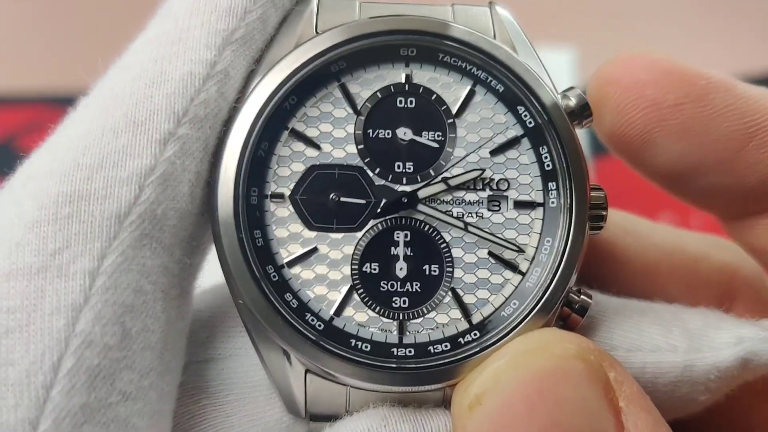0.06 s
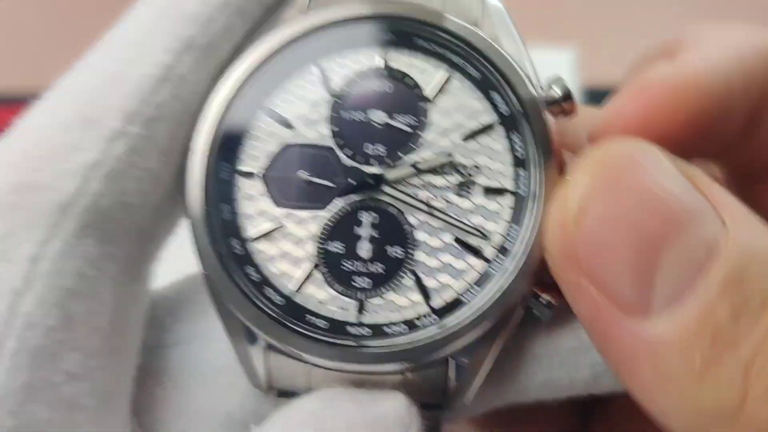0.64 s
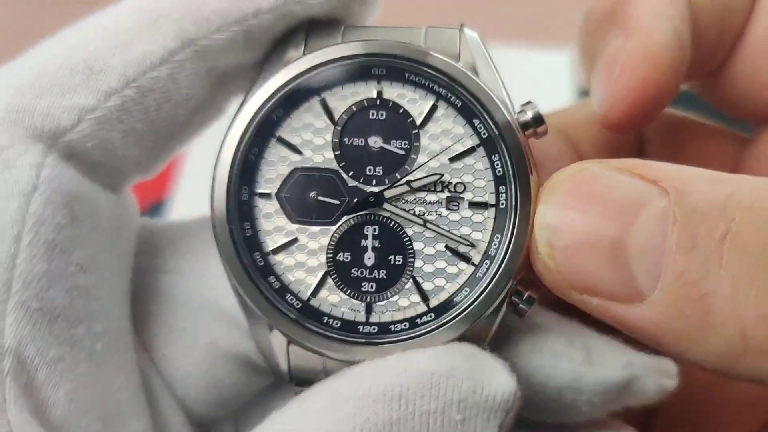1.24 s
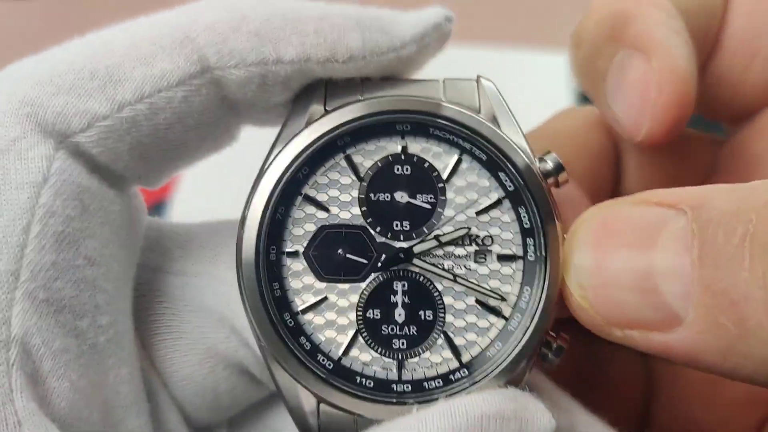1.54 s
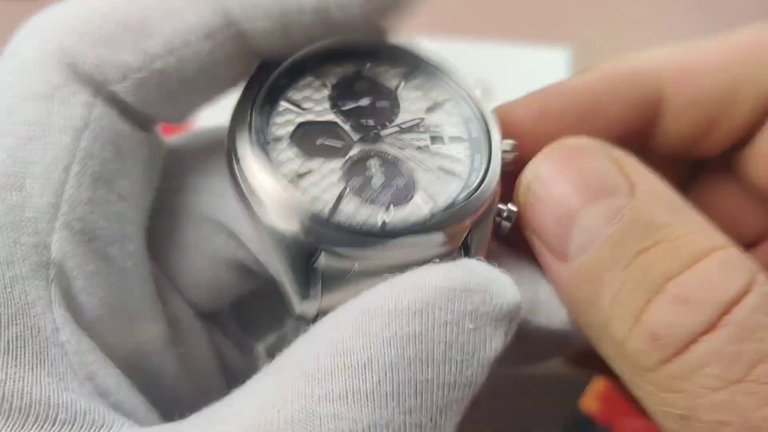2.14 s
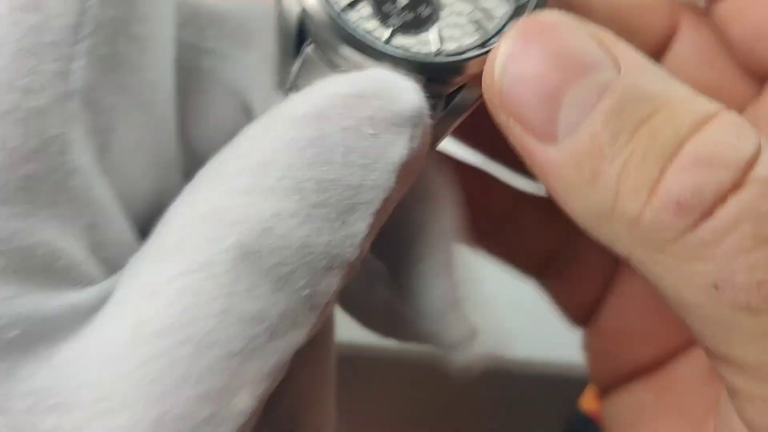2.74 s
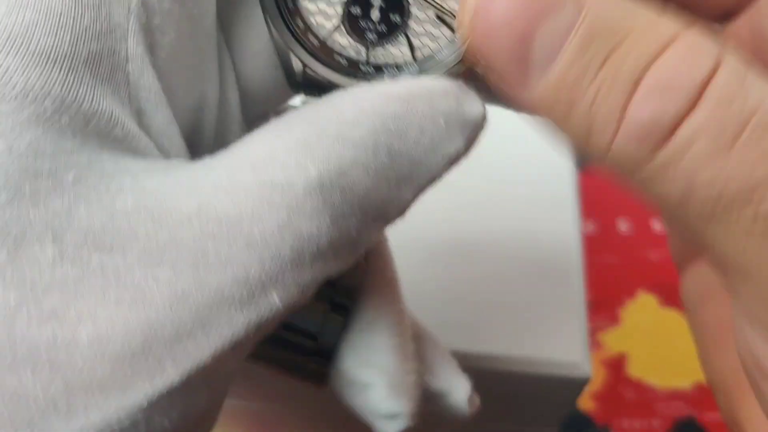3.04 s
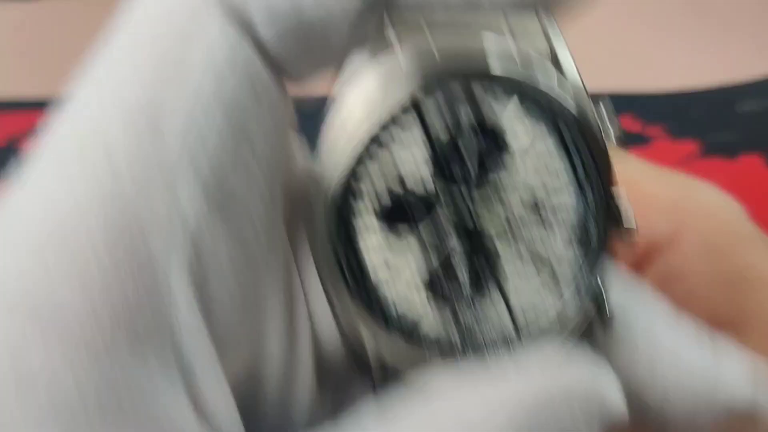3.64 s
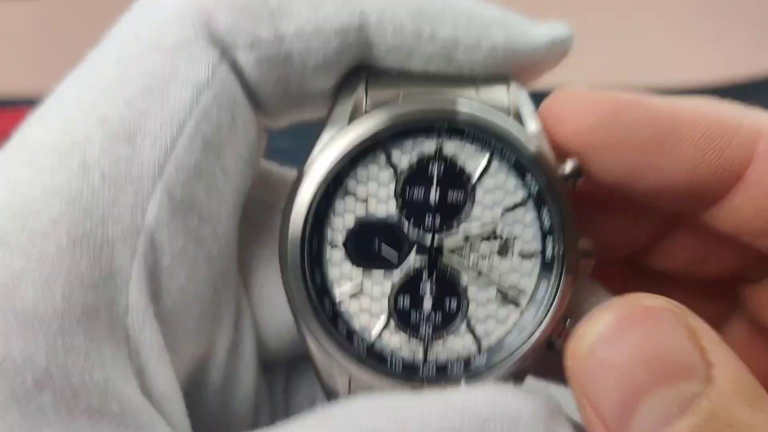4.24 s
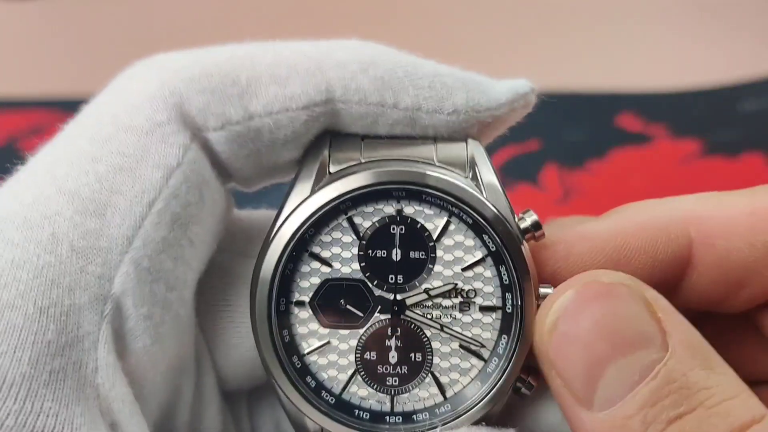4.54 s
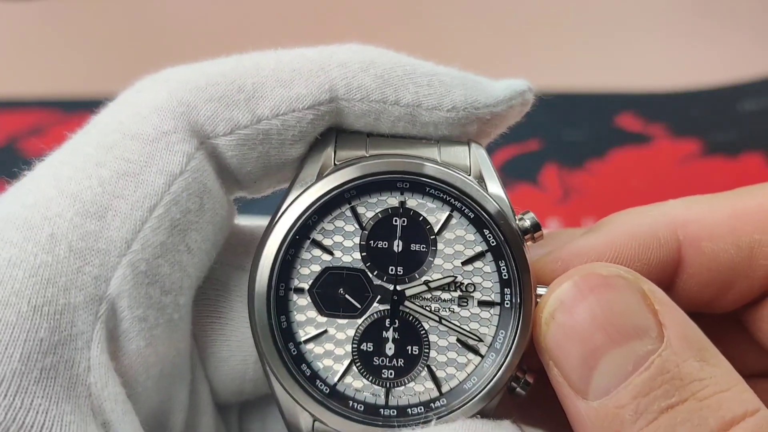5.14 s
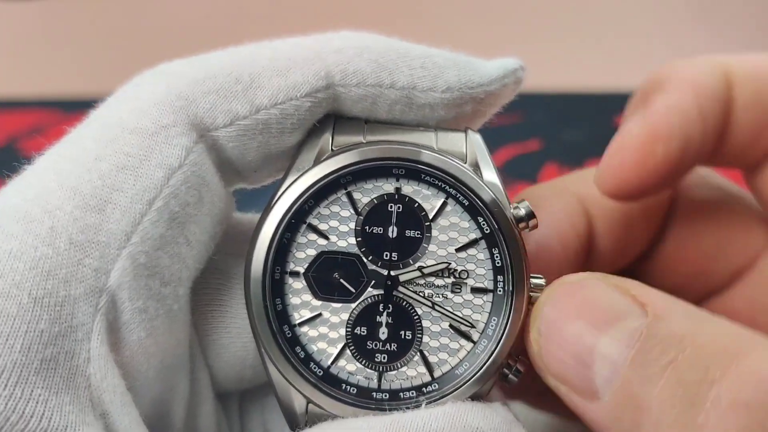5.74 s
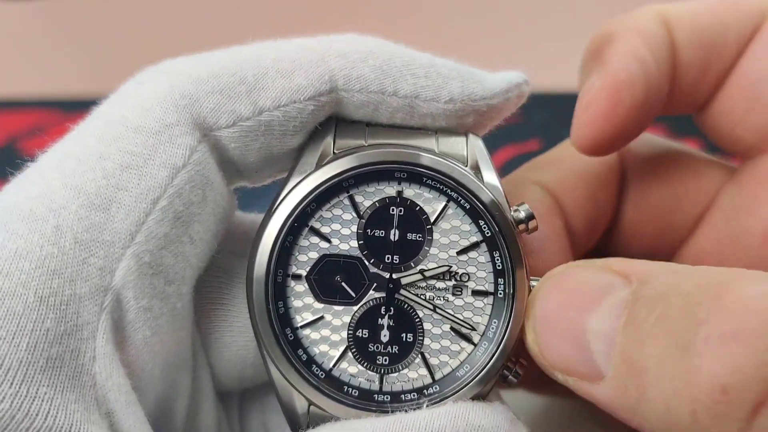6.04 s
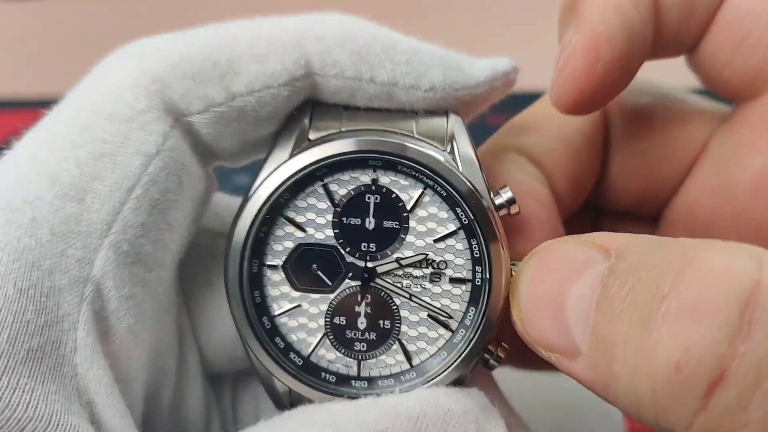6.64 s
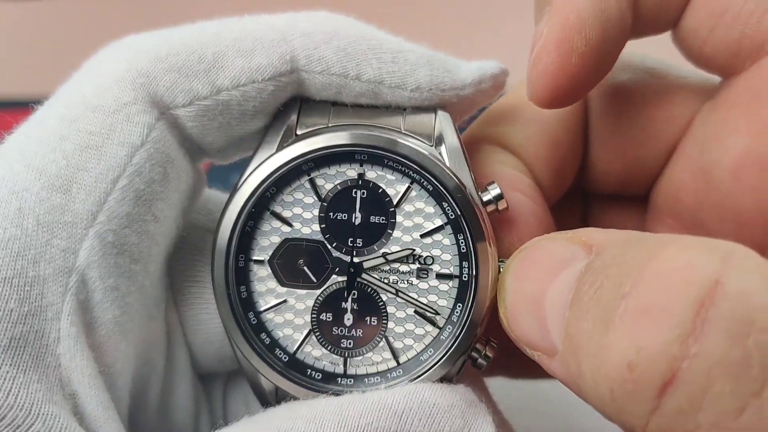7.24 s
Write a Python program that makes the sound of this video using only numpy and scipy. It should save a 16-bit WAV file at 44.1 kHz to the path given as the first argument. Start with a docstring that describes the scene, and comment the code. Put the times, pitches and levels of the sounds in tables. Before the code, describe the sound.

A cotton-gloved hand turns a steel wristwatch very close to the microphone, in a quiet room with a faint low rumble. For the first two seconds there are only soft brushes of fabric and a few tiny clicks. At about 2.1 seconds the glove bumps and rubs the microphone's housing, with a loud hollow knock near 2.3, a brief rough groan and two sharp clicks around 2.5. Softer cloth hiss and small bracelet ticks follow until 3.4. Another loud knock at 3.5 starts a busier run of hollow bumps, juddering scuffs and metallic clicks, with strong knocks near 3.8 and 4.4, dying down at about 5 seconds. From there until the end, a little after 7 seconds, fingers working the crown make faint, irregular taps, with an occasional light brush of cloth.

```python
"""The hollow housing of a small camera knocks and drones as a cotton-gloved hand bumps and rubs it.
Impact and stick-slip friction excite the same damped modes; a tight grip makes the main one groan.
The hand is turning a steel wristwatch: the weave hisses and snags, the bracelet's links resonate,
and later, fingers working the crown pass faint taps into the housing.
The desk adds early reflections, the quiet room a faint reverberation and rumble."""
import sys
import numpy as np
from scipy import signal
from scipy.fft import rfft, irfft, next_fast_len
from scipy.io import wavfile

SR = 44100
rng = np.random.default_rng(int(sys.argv[2]) if len(sys.argv) > 2 else 0)


def transcribe(u):
    """Save the signal u as a 16-bit wav file named by the first command-line argument.

    u: samples, shape (n,) or (channels, n), limited to [-1, 1]; the rate is SR.
    q: integer samples, one column per channel.
    """
    v = np.clip(np.atleast_2d(u).T, -1, 1)
    q = np.round(v * 32767).astype(np.int16)
    wavfile.write(sys.argv[1], SR, q)


N = 321397
TIME = np.arange(N) / SR
CUTOFF_HZ = 16000

# drags of the glove over the housing: t/s, length/s, friction/dB, hiss/dB, hardness/(dB/octave), swell/dB
STROKES = [(0.907, 0.86, -80.5, -78, 3, -6.5), (2.135, 0.05, -46.5, -48.5, -13, -0.5),
           (2.198, 0.056, -53.5, -48, 6, 3.5), (2.268, 0.043, -43.5, -53.5, -10.5, -1),
           (2.359, 0.14, -40, -54, -11.5, 6), (2.541, 0.049, -41, -53.5, -24, 4.5),
           (2.604, 0.05, -63, -59, 8.5, 1), (3.36, 0.15, -71.5, -61.5, 8.5, 13.5),
           (3.53, 0.038, -39, -47.5, -8.5, -3.5), (3.587, .14, -50, -53.5, 0, 1),
           (3.733, 0.055, -48, -52.5, 7.5, 4), (3.839, 0.026, -44, -47.5, -5.5, -5.5),
           (3.881, 0.067, -47, -62, -4, -2.5), (3.968, 0.11, -66, -68.5, 7.5, -9.5),
           (4.084, 0.15, -66.5, -65, 9, 6), (4.181, 0.098, -42, -53.5, 2.5, 8.5),
           (4.298, 0.093, -35.5, -52, 4, -2), (4.436, 0.039, -44.5, -62.5, -14, 0),
           (4.497, 0.025, -39, -61, -8, 5), (4.544, 0.078, -48.5, -63, -14, -2.5),
           (4.625, 0.16, -59.5, -69, 5.5, 3), (4.719, 0.045, -45, -62, 0, 0.5),
           (4.78, 0.15, -55, -70, -8, -2), (4.953, 0.15, -69.5, -82, -1, -11),
           (5.217, 0.069, -65, -91, 0, -4)]
# resonances of the steel links: f/Hz, bandwidth/Hz, level/dB
LINK_MODES = [(4703, 170, -2), (7670, 390, -2), (12450, 300, -17), (15300, 500, -3)]
# left-right coherence of the cloth's noise: f/Hz, correlation/1
CLOTH_COHERENCE = [(600, 0.95), (4000, 0)]


def knocks(level_db=-4.0, contact_hz=1750, panel_hz=(700, 1100), stand_below_hz=180):
    """Impact excitation, padded by cotton: hardness favours high modes, the spot hit panel or stand."""
    onsets, blow_db, hardness, _, panel_db, stand_db = np.transpose(bumps())

    def force_at(octaves, hz):
        force = np.zeros(N)
        spot_db = panel_db * (panel_hz[0] < hz < panel_hz[1]) + stand_db * (hz < stand_below_hz)
        force[np.round(onsets * SR).astype(int)] = -from_db(blow_db + hardness * octaves + spot_db)
        return force
    return from_db(level_db) * low_pass(housing(force_at), contact_hz, order=3)


def bumps(tap_hardness=0.0, tap_crackle_db=-26, tap_panel_db=2):
    """Impulses on the housing, direct or structure-borne, all in the columns of the blows."""
    # the hand's blows: t/s, level/dB, hardness/(dB/octave), crackle/dB, panel boost/dB, stand boost/dB
    blows = [(1.5673, -58.5, 9, -64, 5, 0), (2.1415, -25, -15, -37.5, -15, -3),
             (2.272, -33, -10, -55, 0, 0), (2.3454, -13.5, -8, -29.5, -1, 2),
             (3.532, -14, 1.5, -28, 1.5, 5), (3.6066, -33.5, -18.5, -55, 0.5, -2.5),
             (3.6516, -32.5, -7.5, -58.5, 0, 0), (3.7081, -32, 9.5, -43.5, 0, 0.5),
             (3.7655, -36, 13.5, -46, -8, 1.5), (3.8341, -14.5, -15.5, -35.5, 14, 0.5),
             (3.8378, -19.5, -2.5, -37.5, 9, -3.5), (3.856, -29.5, -3.5, -44, 1.5, 1.5),
             (3.8705, -31.5, 12, -40, 1, 0), (4.1039, -33.5, 2.5, -54, -4.5, -4),
             (4.1369, -41.5, -23, -56.5, -1.5, -3), (4.2998, -26, -10, -58, -2, 0),
             (4.3423, -25.5, 7, -38, 1, -0.5), (4.4254, -13.5, -3, -49.5, -1.5, -13),
             (4.5021, -30, 2, -68, 3, -11), (4.5212, -31, -10, -35, -1, -5.5),
             (4.5754, -25.5, 10, -41, 5.5, -7), (4.633, -40, -5, -48.5, 3, -9),
             (4.791, -25.5, -3, -51.5, -9, -6), (4.8542, -22, 6, -63.5, 2.5, -4)]
    # taps from fingers on the crown: t/s, level/dB
    taps = [(5.0143, -50.5), (5.1838, -55.5), (5.532, -58), (5.6737, -45), (5.7488, -55.5), (5.794, -51.5),
            (5.8034, -52), (5.935, -41.5), (5.9444, -53), (6.1086, -50.5), (6.122, -46.5), (6.2048, -56.5),
            (6.3553, -56), (6.6603, -46.5), (6.6785, -56.5), (6.7434, -56), (6.935, -55)]
    return blows + [(s, db, tap_hardness, db + tap_crackle_db, tap_panel_db, 0) for s, db in taps]


def housing(force_at, left_db=3.0, lag_s=.0001, left_db_per_octave=5.0):
    """Modal superposition: force_at(octaves above the main mode, hz) drives each damped resonator."""
    # modes of the housing on its stand: f/Hz, level/dB, T60/s
    modes = [(55, -29, 0.28), (135, -23.5, 0.13), (252, -19, .04), (333.5, -12, 0.05), (483.8, 4, 0.029),
             (535, -23.5, 0.31), (578, -13, 0.05), (798, -10, 0.043), (920, -9, 0.016), (1357, -11.5, 0.02),
             (1460, -25, 0.029), (2505, -16, 0.011)]
    main_hz = max(modes, key=lambda mode: mode[1])[0]
    out = np.zeros((2, N))
    for hz, level_db, t60 in modes:
        radius, angle = from_db(-60 / (t60 * SR)), 2 * np.pi * hz / SR
        poles = [1, -2 * radius * np.cos(angle), radius * radius]
        octaves = np.clip(np.log2(hz / main_hz), -.4, 1.7)
        ring = signal.lfilter([1, 0, -1], poles, force_at(octaves, hz) + 1e-18) / 2
        # upper modes differ more between the two microphone ports
        ports = np.array([ring, delayed(ring, lag_s * (1 + octaves / 2))])
        out += from_db(level_db) * ports * pan(left_db + left_db_per_octave * octaves)
    return out


def drag(level_db=-21.5, contact_hz=2300, judder_db=2.0,
         scuff_db=-25, scuff_growth=0.73, scuff_t60=0.13, scuff_hardness=-1.4):
    """Stick-slip friction: random slips drive the housing during each stroke and each bump's scuff."""
    _, _, friction_db, _, hardness, _ = np.transpose(STROKES)
    stroke_powers = np.array([rub(s, length, swell) for s, length, *_, swell in STROKES]) ** 2
    scuffs = bursts([(s, scuff_db + scuff_growth * db, scuff_t60) for s, db, *_ in bumps()], rise_s=.001)
    judder = from_db(judder_db * drift(90))
    slipping = slips(per_s=2600, spread_db=-0.5)

    def force_at(octaves, hz):
        pressure = judder * np.sqrt(from_db(friction_db + hardness * octaves) ** 2 @ stroke_powers)
        return slipping * np.hypot(pressure, scuffs * from_db(scuff_hardness * octaves))
    return from_db(level_db) * low_pass(housing(force_at), contact_hz)


def groan(sag_hz_per_s=291, jitter=.065, throb_hz=65):
    """Mode locking: slips fall in step with the main mode; the rough tone sags as the grip tightens."""
    # tight grips of the glove: t/s, length/s, level/dB, starting f/Hz
    grips = [(2.372, 0.12, -33.5, 532), (2.544, .025, -42, 510)]
    waver = 1 + jitter * drift(150)
    throb = 1 + 0.71 * np.sin(2 * np.pi * throb_hz * TIME + drift(40))
    out = np.zeros((2, N))
    for s, length, db, hz in grips:
        pitch = hz - sag_hz_per_s * np.clip(TIME - s, 0, length)
        phase = 2 * np.pi * np.cumsum(pitch * waver) / SR
        tone = np.sin([phase, phase - .5])   # the right port lags
        out += from_db(db) * rub(s, length, swell_db=2.5) * tone
    return throb * out * pan(left_db=3.0)


def cloth(level_db=-.5, grain_db=2.0, flutter_db=1.5, fibre_db=-6.5, firm_db=-53, firm_slope=0.35):
    """Friction noise: the sliding weave hisses and forces the links to ring, more so in firm strokes."""
    # spectrum of the weave: f/Hz, density/dB
    spectrum = [(300, 5.5), (1000, -6), (2200, 6.5), (3400, 5.5), (4700, 6.5), (5700, 0.5), (8000, 1),
                (10000, -1), (12500, 1.5), (15500, 2)]
    hiss_db = sliding_db()
    gain = from_db(level_db + hiss_db + flutter_db * drift(110))
    # single fibres flick free as tiny, sparse clicks
    fibres = np.array([signal.lfilter([1, -.5], [1], slips(per_s=310, spread_db=4.5)) for _ in range(2)])
    grains = from_db(grain_db * drift(900)) * coloured_noise(spectrum, CLOTH_COHERENCE)
    hiss = gain * (grains + from_db(fibre_db) * fibres) * pan(left_db=1.8)
    firmness_db = firm_slope * (hiss_db - firm_db)
    links = sum(resonance(hiss * from_db(db + firmness_db + 1.7 * drift(13)), hz, width)
                for hz, width, db in LINK_MODES)
    return hiss + links


def sliding_db(resting_db=-81):
    """Incoherent addition: strokes, brushes and the never quite still glove sum in power to one level."""
    # cotton brushing steel and skin, clear of the housing: t/s, length/s, hiss/dB
    brushes = [(0.549, .085, -70.5), (0.653, 0.15, -75.5), (0.916, .045, -67), (1.144, 0.14, -76),
               (2.03, 0.02, -70.5), (2.69, 0.61, -69.5), (2.718, .13, -67.5), (2.924, 0.076, -72),
               (3.06, 0.033, -66.5), (5.657, 0.098, -76), (6.615, 0.15, -79)]
    rubs = [from_db(db) * rub(s, length, swell) for s, length, _, db, _, swell in STROKES]
    rubs += [from_db(db) * rub(s, length) for s, length, db in brushes]
    return 10 * np.log10(from_db(resting_db) ** 2 + sum(one ** 2 for one in rubs))


def snags(level_db=0.5, grain_db=2.5, ring_db=9.0, links_db=3.5, bump_t60=0.042, snag_t60=0.029):
    """Transient excitation: a bump shakes all links; each listed crackle rings one resonance."""
    # snags of the weave, ticks of the bracelet and the duller crackle of some knocks:
    # t/s, level/dB, resonance f/Hz
    snags_and_ticks = [(0.096, -63, 5000), (0.445, -65.5, 1500), (0.687, -65, 5000), (0.726, -62, 4780),
                       (1.5686, -60.5, 4800), (2.163, -42, 4200), (2.4804, -37, 4460),
                       (2.5318, -38.5, 4000), (2.649, -54, 4740), (2.7347, -52, 4470), (2.7503, -52, 11900),
                       (2.773, -51, 11900), (2.786, -50, 11900), (2.796, -49, 11830), (3.0752, -56.5, 3990),
                       (3.099, -56, 5600), (3.1517, -57.5, 4700), (3.2713, -56.5, 7600),
                       (3.3483, -55, 7600), (3.3957, -57, 7200), (3.9476, -55.5, 4900), (4.098, -54, 11200),
                       (4.2357, -40.5, 8150), (4.2606, -45, 8040), (4.3894, -44, 4500), (4.4257, -43, 3630),
                       (4.5322, -45, 11500), (4.6307, -46.5, 8100), (4.854, -50.5, 4400),
                       (5.747, -61.5, 4640)]
    # spectrum of the crackle: f/Hz, density/dB
    spectrum = [(500, -9.5), (1500, 2.5), (4700, 0), (10000, 0), (15500, 0)]
    gain = from_db(level_db + grain_db * drift(1500))
    grains = gain * coloured_noise(spectrum, CLOTH_COHERENCE) * pan(left_db=2.2)
    shaken = grains * bursts([(s, db, bump_t60) for s, _, _, db, *_ in bumps()], rise_s=.001)
    out = shaken + sum(from_db(links_db + db) * resonance(shaken, hz, width)
                       for hz, width, db in LINK_MODES)
    for s, db, hz in snags_and_ticks:
        span = slice(int(s * SR), int(s * SR) + SR // 4)
        crackle = grains[:, span] * bursts([(s, db, snag_t60)], rise_s=0.00049)[span]
        out[:, span] += crackle + from_db(ring_db) * resonance(crackle, hz, width_hz=550)
    return out


def desk(x):
    """Comb filtering: early reflections interfere with the direct sound."""
    # reflections off the desk and a box: left delay/s, right delay/s, level/dB
    echoes = [(.0041, 0.0032, -24), (.0083, 0.01, -14.5)]
    return x + sum(from_db(db) * np.array([delayed(x[0], left_s), delayed(x[1], right_s)])
                   for left_s, right_s, db in echoes)


def room(x, loops_per_side=8):
    """Reverberation: echoes circulate between the walls, and the bass is absorbed most slowly."""
    # reverberation time: f/Hz, T60/s
    decay_times = [(500, 0.53), (1200, 0.12), (14000, 0.35)]
    size = next_fast_len(N + SR)
    hz = np.maximum(np.fft.rfftfreq(size, 1 / SR), 1)
    loss_per_s = np.log(1000) / at_hz(decay_times, hz)
    response = np.zeros((2, len(hz)), complex)
    for k, delay_s in enumerate(rng.uniform(0.02, 0.036, 2 * loops_per_side)):
        round_trip = np.exp(-delay_s * (loss_per_s + 2j * np.pi * hz))
        response[k % 2] += (-1) ** (k // 2) * round_trip / (1 - round_trip)
    return irfft(rfft(x, size) * response / np.sqrt(loops_per_side), size)[:, :N]


def background(level_db=-63.5):
    """Stationary noise floor: low room rumble and the microphones' hiss."""
    # spectrum of the floor: f/Hz, density/dB
    spectrum = [(12, -43.5), (20, -8.5), (55, 0), (76, -15.5), (126, -15.5), (158, -18), (419, -22),
                (554, -24), (942, -26.5), (1080, -27.5), (2120, -32.5), (4500, -37.5), (4890, -39),
                (6120, -43), (15800, -32.5)]
    # its left-right coherence: f/Hz, correlation/1
    coherence = [(300, 0.43), (1000, 0.07), (3000, 0.084), (12000, 0.028)]
    return from_db(level_db) * coloured_noise(spectrum, coherence)


def rub(s, length_s, swell_db=0, attack_s=0.0069, release_t60=0.15):
    """Attack, sustain and release: a rub takes hold, swells or fades, and lets go."""
    out, start = np.zeros(N), int(s * SR)
    age = TIME[:min(N - start, int((length_s + .5) * SR))]
    held = from_db(swell_db * (np.minimum(age / length_s, 1) - .5))
    release = np.exp(-np.log(1000) * np.maximum(age - length_s, 0) / release_t60)
    out[start:start + len(age)] = (1 - np.exp(-age / attack_s)) * held * release
    return out


def bursts(events, rise_s):
    """Exponential rise and decay: the summed envelope of events (t/s, level/dB, T60/s)."""
    out, age = np.zeros(N), TIME[:SR // 4]
    for s, level_db, t60 in events:
        start = int(s * SR)
        shape = (1 - np.exp(-age / rise_s)) * np.exp(-np.log(1000) * age / t60)
        out[start:start + len(age)] += from_db(level_db) * shape[:N - start]
    return out


def slips(per_s, spread_db):
    """Poisson impulses of rms 1: threads catch and let go with uneven force."""
    sizes = from_db(spread_db * np.minimum(rng.exponential(1, N), 4)) * rng.choice([-1, 1], N)
    return rms_one(sizes * (rng.random(N) < per_s / SR))


def coloured_noise(spectrum, coherence):
    """Partly coherent stereo noise of rms 1: the mid-side balance sets the correlation."""
    size = next_fast_len(N)
    hz = np.maximum(np.fft.rfftfreq(size, 1 / SR), 1)
    mid, side = rfft(rng.standard_normal((2, size)))
    correlation = at_hz(coherence, hz)
    stereo = np.sqrt(1 + correlation) * mid + np.sqrt(1 - correlation) * side * [[1], [-1]]
    shaped = stereo * from_db(at_hz(spectrum, hz)) * (hz < CUTOFF_HZ)
    return rms_one(irfft(shaped, size)[:, :N])


def drift(per_s):
    """Random modulation of rms 1, linear between knots."""
    knots = rng.standard_normal(N // 8)
    return rms_one(np.interp(TIME * per_s, np.arange(len(knots)), knots))


def resonance(x, hz, width_hz):
    """Second-order resonator with unit peak gain."""
    return signal.lfilter(*signal.iirpeak(hz, hz / width_hz, fs=SR), x + 1e-18)


def low_pass(x, hz, order=2):
    """Maximally flat low-pass filter."""
    return signal.sosfilt(signal.butter(order, hz, fs=SR, output="sos"), x + 1e-18)


def delayed(x, s):
    """Propagation delay."""
    return np.interp(TIME - s, TIME, x, left=0)


def pan(left_db):
    """Channel gains for a level difference."""
    return from_db(np.array([[left_db], [-left_db]]) / 2)


def at_hz(points, hz):
    """Interpolation on a log-frequency axis."""
    frequencies, values = np.transpose(points)
    return np.interp(np.log(hz), np.log(frequencies), values)


def from_db(db):
    """Level to amplitude ratio."""
    return 10 ** (np.asarray(db) / 20)


def rms_one(x):
    """Normalisation to unit power."""
    return x / np.sqrt(np.mean(x ** 2) + 1e-20)


def scene(body_room_db=-20, cloth_room_db=-17):
    """Superposition: housing and cloth are close, so direct sound outweighs reverberation."""
    body = knocks() + drag() + groan()
    weave = cloth() + snags()
    reverberation = room(from_db(body_room_db) * body + from_db(cloth_room_db) * weave)
    return desk(body + weave) + reverberation + background()


def record(dry):
    """Band limiting: a steep elliptic low-pass cuts the top."""
    return signal.sosfilt(signal.ellip(12, .1, 80, CUTOFF_HZ, fs=SR, output="sos"), dry)


dry = scene()
out = record(dry)
transcribe(out)
```